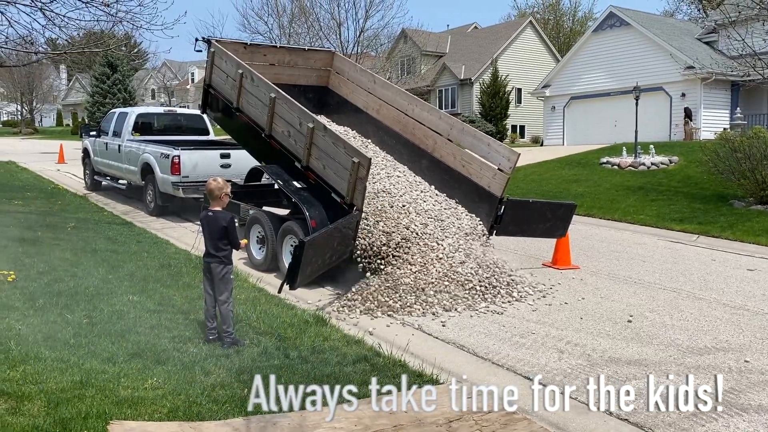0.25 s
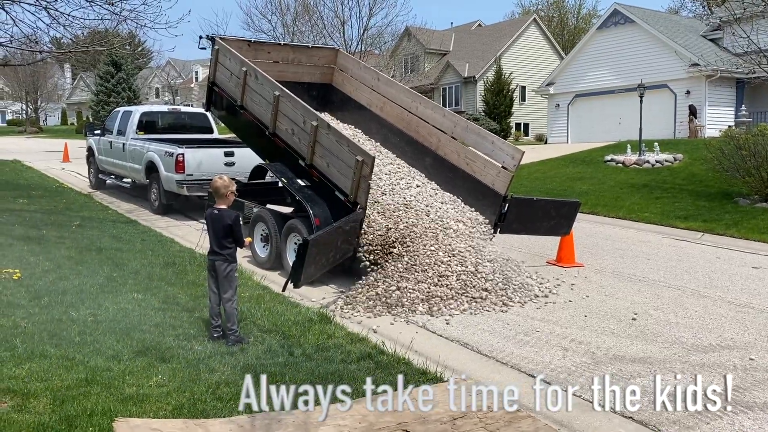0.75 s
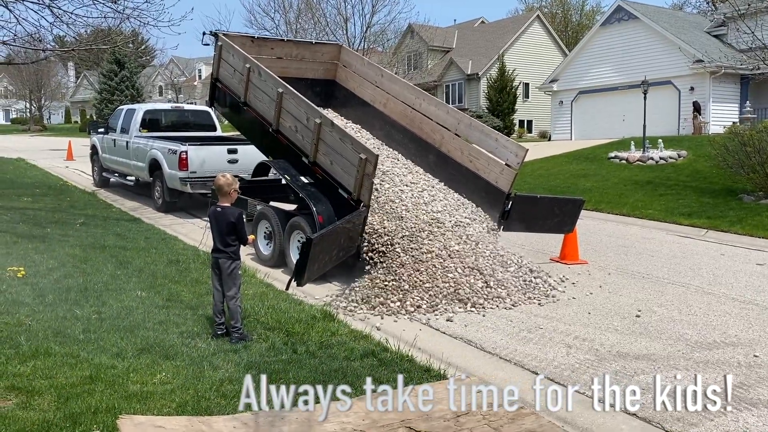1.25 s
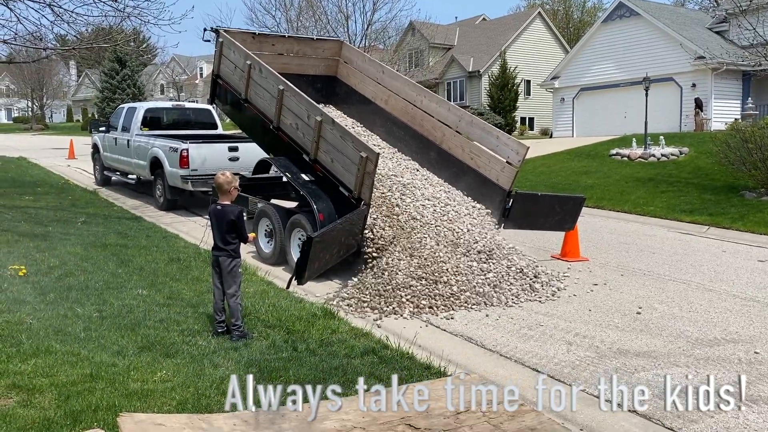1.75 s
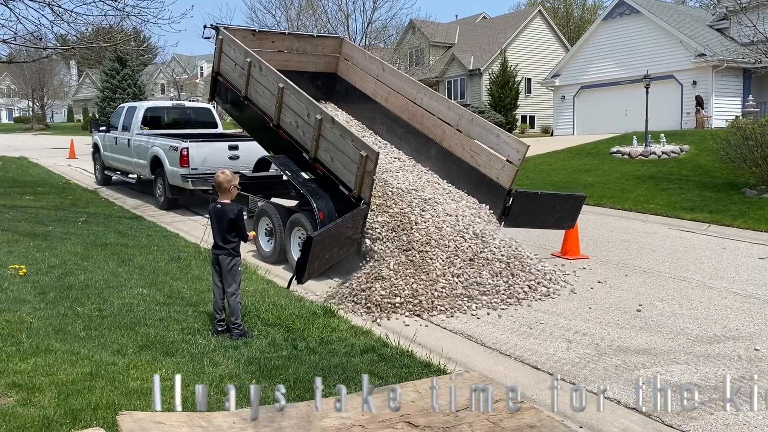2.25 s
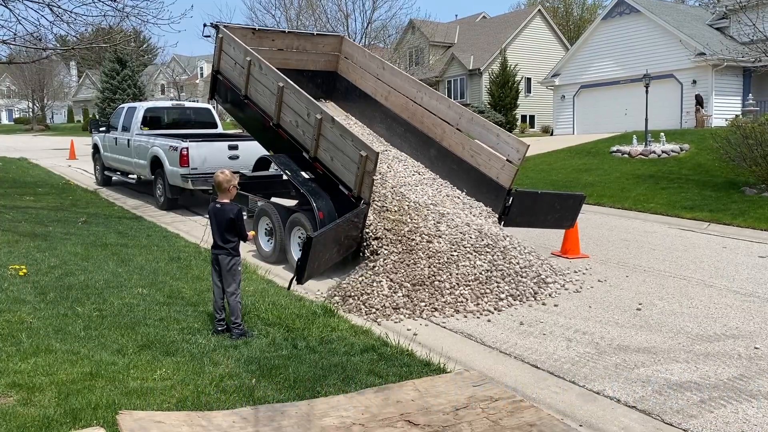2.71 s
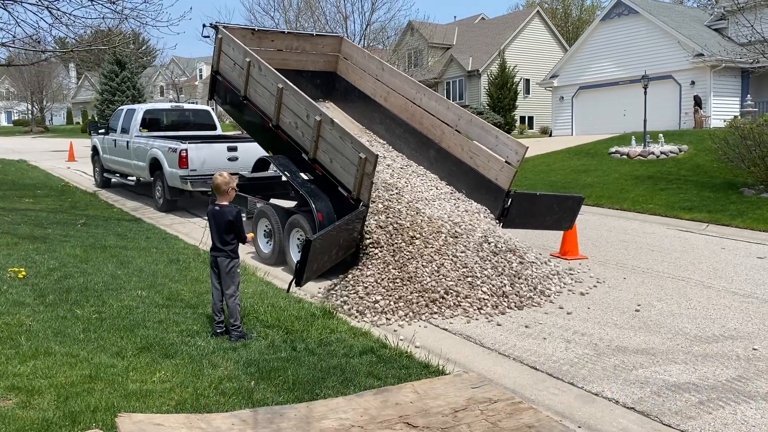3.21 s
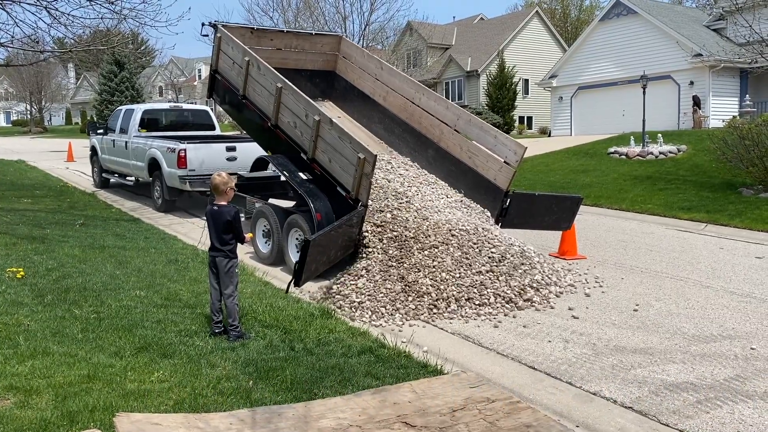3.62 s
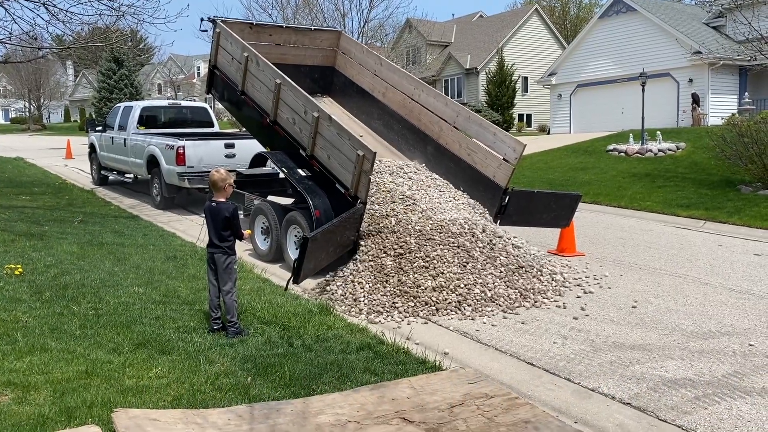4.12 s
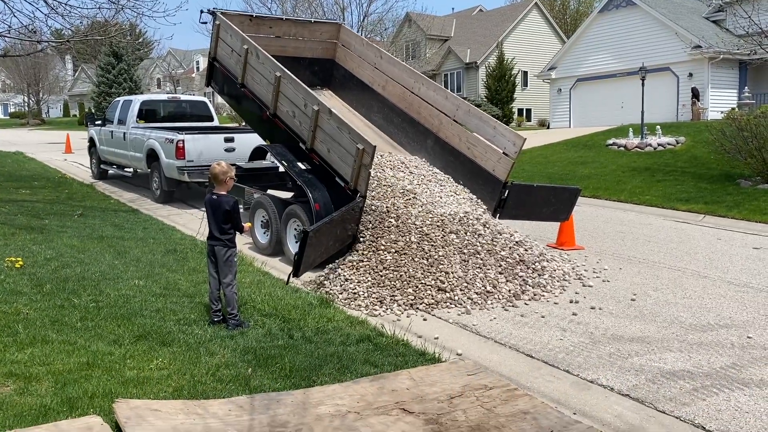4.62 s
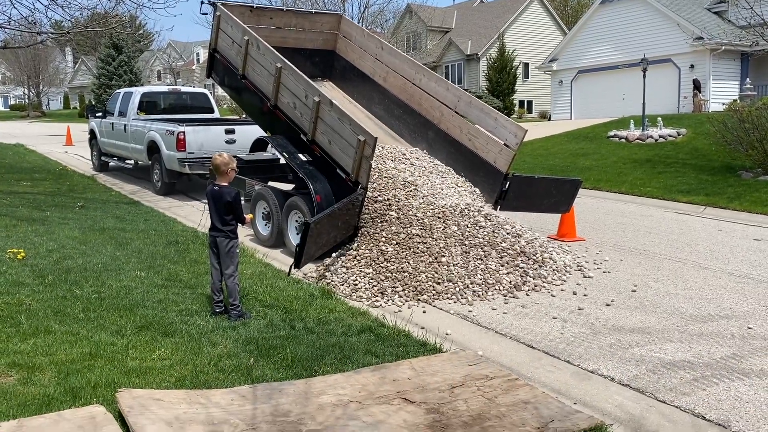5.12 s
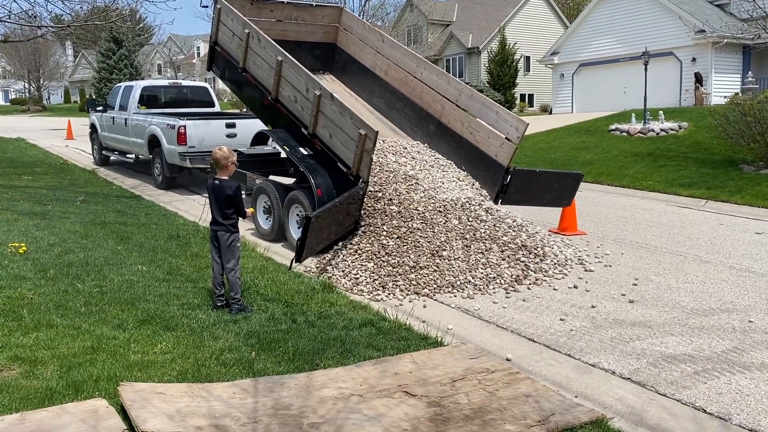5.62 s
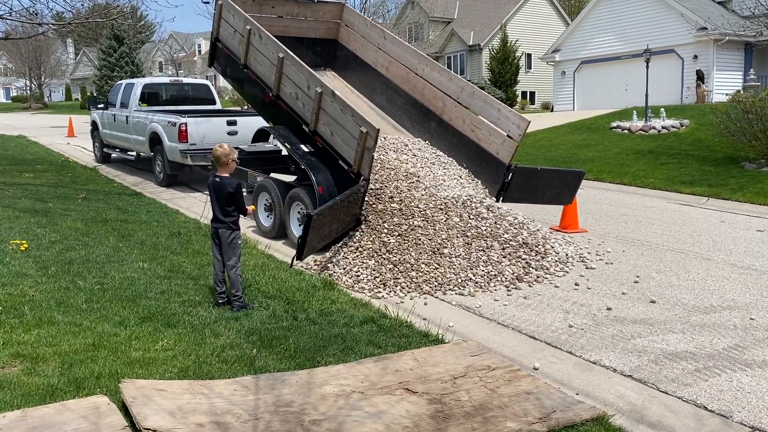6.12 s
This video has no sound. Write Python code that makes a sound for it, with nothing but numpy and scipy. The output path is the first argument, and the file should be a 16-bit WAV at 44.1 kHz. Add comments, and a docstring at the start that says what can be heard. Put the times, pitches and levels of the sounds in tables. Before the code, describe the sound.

Dense roaring clatter of stones pouring off a steep dump bed, ending after four seconds in scattered knocks over a faint idling truck.

```python
"""A truck idles throughout, as filtered noise and a wavering hum, outdoors on a close microphone pair.
From the start rock pours from its tipped trailer: thousands of random contacts a second in coloured bands,
with moving bed resonances and big rocks cracking on top. The rush runs out between about 3.5 and 4.6 s.
Then a fading trickle, short slides, knocks and ticks of single stones and soft bed thumps are left."""
import sys
import numpy as np
from scipy import signal
from scipy.fft import rfft, irfft, next_fast_len
from scipy.io import wavfile

SR = 44100
rng = np.random.default_rng(int(sys.argv[2]) if len(sys.argv) > 2 else 0)


def wav_record(signal):
    """Record a signal, one row per channel, as 16-bit PCM in the file named by sys.argv[1]."""
    frames = np.transpose(np.atleast_2d(signal))
    bounded = np.clip(frames, -1, 1)
    # unit amplitude maps onto the largest positive 16-bit level
    quanta = np.round(bounded * 32767).astype(np.int16)
    wavfile.write(sys.argv[1], SR, quanta)


N = 280035

# engine rumble colour: freq_hz, relative_density_db (per Hz)
IDLE_SPECTRUM = [(20, -22), (35, -21), (55, -10), (78, 1), (112, -10), (140, -13.5), (185, -7.5),
                 (300, -28), (800, -42)]
# engine hum: multiple_of_idle_hz, level_db (rms)
IDLE_ORDERS = [(1, -56), (4, -67.5)]
# bed jolts on its frame: start_s, level_db, pitch_hz
THUMPS = [(4.892, -32, 60), (5.455, -42, 89), (5.574, -33, 63)]
# colour of loose stones: freq_hz, relative_density_db (per Hz)
TRICKLE_SPECTRUM = [(60, 0.5), (170, -7), (280, -5.5), (420, -3.5), (580, -3.5), (720, 4), (820, 1.5),
                    (950, -1), (1300, -0.3), (1750, -4), (2350, 0.7), (3100, -5.5), (4000, -12),
                    (5600, -9.5), (10500, -22), (15000, -36)]
# small slides of a handful of stones: start_s, length_s, level_db, treble_lift_db, low_mid_lift_db
SLIDES = [(4.523, 0.09, -38, 5, -13), (4.826, 0.037, -36.5, 5, -2), (4.874, 0.067, -44, -12, 4),
          (5.262, 0.14, -36.5, -17, -1), (5.402, .1, -41, -14, -1), (5.45, 0.15, -42, -11, 1),
          (5.633, 0.13, -44, 0, 7), (5.764, 0.12, -47.5, -3, 6)]
# heavy stones knocking on bed or heap: start_s, relative_level_db, pitch_hz
KNOCKS = [(4.423, -37, 900), (4.499, -26, 1180), (4.5265, -24, 1900), (4.546, -18, 2460), (4.66, -31, 1150),
          (4.7465, -28, 900), (4.755, -23, 1800), (4.8335, -24, 2400), (4.842, -20, 2100),
          (4.8445, -18, 1390), (4.8485, -31, 1050), (4.858, -21, 1450), (4.8615, -21.5, 2000),
          (4.893, -34, 840), (5.001, -24.5, 900), (5.096, -25, 2750), (5.139, -26, 1360),
          (5.213, -30, 1300), (5.256, -21.5, 1210), (5.27, -29, 1500), (5.2895, -21, 1900),
          (5.293, -32, 950), (5.333, -27, 2400), (5.363, -35, 750), (5.39, -31, 870), (5.423, -34, 2300),
          (5.4575, -31, 950), (5.467, -30, 2300), (5.474, -27, 1100), (5.487, -26, 850), (5.4995, -26, 900),
          (5.638, -26, 1460), (5.645, -26, 800), (5.654, -27, 2300), (5.676, -35, 1090), (5.708, -35, 750),
          (5.733, -36, 750), (5.791, -31, 2300), (5.81, -41, 1200), (5.857, -36, 2300), (5.86, -28, 840),
          (5.915, -25.5, 1240), (5.9865, -33, 2700), (6.011, -29, 1590), (6.04, -32, 2300),
          (6.153, -32, 2270), (6.19, -46, 800), (6.222, -36, 2320)]
# hard stone-on-stone ticks: start_s, relative_level_db, pitch_hz
TICKS = [(4.4767, -27, 6100), (4.486, -34, 5500), (4.53, -34, 6300), (4.8255, -25.5, 6100),
         (4.9695, -35, 5000), (5.1234, -35, 9800), (5.2324, -33, 4800), (5.2773, -34, 5800),
         (5.3123, -36, 6310), (5.34, -42, 7500), (5.351, -40, 4700), (5.4594, -34, 7440),
         (5.4993, -41, 5190), (5.5777, -34, 7400), (5.651, -37, 6000), (5.711, -40, 6500),
         (5.786, -41, 7300), (5.8091, -37, 4000), (5.871, -45, 3300), (5.951, -41, 4200),
         (5.9578, -34, 3700), (5.963, -34, 4900), (5.9868, -39, 3600), (6.0825, -41, 5540),
         (6.1109, -38, 6500), (6.12, -34, 3100), (6.293, -36, 6470), (6.302, -38, 8800)]
# big rocks cracking together above the rush: start_s, relative_level_db, pitch_hz
CRACKS = [(.1296, -22, 2020), (.4439, -10, 2150), (.601, -13, 2120), (.9223, -8.5, 2170), (.9842, -7, 2050),
          (1.0789, -18, 1980), (1.2216, -14, 2060), (1.4865, -8.5, 2260), (1.6955, -7, 2060),
          (2.0552, -22, 2120), (2.6648, -8, 2030), (3.016, -10.5, 2120)]
# colour of rock in the trailer, bed humps near 750 and 2100 Hz: freq_hz, relative_density_db (per Hz)
POUR_SPECTRUM = [(40, -16.5), (90, -7), (190, -5), (320, -2.5), (415, -6), (580, -2), (680, 0), (790, 1.4),
                 (920, -4.5), (1330, -2), (1580, -4), (2000, 0), (2350, -1.5), (3200, -12), (4100, -20.5),
                 (5500, -17.5), (7200, -20), (10500, -24.5), (15000, -35)]
# lumps of the load jam or let go: centre_s, half_length_s, flow_db, drumming_db, clatter_db
SURGES = [(0.05, 0.074, 1.1, -3.5, -2), (0.197, 0.045, 0.2, 0.5, 0), (0.423, 0.13, 1, -1.5, 1.3),
          (0.622, 0.036, 0.7, -2.5, -0.5), (0.834, 0.062, 0.8, 1.5, -0.2), (1.034, 0.046, 0.5, -1.5, -0.5),
          (1.205, .15, 0, 0.5, 0.5), (1.48, 0.033, -1, 0, 1.5), (1.656, 0.035, 0, 5.5, -0.5),
          (1.907, 0.3, 1.44, -0.5, 0.5), (2.083, 0.083, -0.3, 3, 0), (2.28, 0.039, -1, 2, 1),
          (2.405, 0.071, -0.5, 2, 1.5), (2.756, 0.16, 0.2, 0.5, 1.4), (2.893, .035, 0, 1, -1),
          (3.027, 0.05, -0.5, 0, 3), (3.273, 0.15, -0.7, 1.5, 3), (3.54, 0.1, -0.5, -1, .8)]
# bed resonances, sliding as it empties, lowest = drumming: full_hz, empty_hz, width_hz, full_db, empty_db
BED_RESONANCES = [(340, 130, 55, -18, 4), (508, 1460, 75, -3, -43), (2080, 3000, 260, -12, -16)]
# left-right likeness of the pour: freq_hz, likeness (0 to 1)
POUR_LIKENESS = [(30, .985), (150, .996), (400, .985), (750, .96), (1300, .96), (1750, .92), (2100, .94),
                 (2700, .62), (3300, .25), (4100, .1), (4800, .55), (5500, .3), (6800, .95), (15000, .96)]
# left-right likeness of loose stones and truck: freq_hz, likeness (0 to 1)
TRICKLE_LIKENESS = [(30, .98), (130, .93), (400, .9), (550, .84), (750, .92), (1000, .8), (1300, .85),
                    (1750, .66), (2200, .82), (3200, .25), (4100, .2), (4800, .5), (5500, .3), (6800, .95),
                    (15000, .96)]
# microphone balance: freq_hz, left_minus_right_db
BALANCE_DB = [(100, -0.1), (350, -.3), (550, -2.1), (850, 1.2), (1200, -.2), (1650, .4), (2000, -3.5),
              (2300, -4.3), (2800, .7), (3400, 1), (3900, -1.3), (4700, .9), (5500, -1.7), (6300, 0),
              (15000, 0)]
# microphone phase: freq_hz, left_lead_rad
LEAD_RAD = [(100, 0), (400, 0), (700, .25), (1500, .05), (1850, -.2), (2200, .1), (2700, 1.6), (3500, 1.1),
            (4400, .3), (7300, 0), (9020, -3.14), (11200, -6.28), (13300, -9.42), (15300, -12.57)]

TIME_S = np.arange(N) / SR
FFT_SIZE = next_fast_len(N + SR // 2, real=True)
FREQ_HZ = np.maximum(np.arange(FFT_SIZE // 2 + 1) * SR / FFT_SIZE, 1)
IDLE_HZ, RUMBLE_DB = 96.9, -50
FULL_DB, SAG_DB_PER_S = -20.5, 0.6149  # the flow sags as the load shrinks
EMPTY_S, RUN_OUT_S = 4.638, 1.1
TRICKLE_DB, TRICKLE_FADE_DB_PER_S = -41.5, 2.5
GRIT_DB, GRIT_FADE_DB_PER_S = 2.5, 3.5  # treble lift of the trickle: fine grit fades first
BED_WANDER = 0.052  # rms share by which resonance pitch strays as the load shifts
BOOM_FULL_DB, BOOM_EMPTY_DB, BOOM_MOST_DB = -3, 22, 3  # a lighter load booms more, up to the limit
SCATTER_DB, SCATTER_T60_S = -8.5, 0.24
CUTOFF_HZ = 15900


def from_db(db):
    """Decibels to gain."""
    return 10 ** (np.asarray(db) / 20)


def rms_one(x):
    """Scale to unit rms."""
    return x / np.sqrt(np.mean(x ** 2) + 1e-20)


def by_hz(points):
    """Read a table along log frequency."""
    hz, value = np.transpose(points)
    return np.interp(np.log(FREQ_HZ), np.log(hz), value)


def drift(rate_hz):
    """Smooth random curve of unit rms, about rate_hz turns a second."""
    pole = np.exp(-200 * np.pi * rate_hz / SR)  # one step per 100 samples
    noise = rng.standard_normal(N // 100 + 1002)
    slow = signal.lfilter([1], [1, -2 * pole, pole * pole], noise)[1000:]
    return np.interp(np.arange(N) / 100, np.arange(len(slow)), rms_one(slow))


def colour(x, spectrum):
    """Minimum-phase filter of the given spectrum; white noise keeps its power."""
    gain = rms_one(from_db(by_hz(spectrum)))
    cepstrum = irfft(np.log(gain), FFT_SIZE)
    cepstrum[1:FFT_SIZE // 2] *= 2
    cepstrum[FFT_SIZE // 2 + 1:] = 0
    return irfft(rfft(x, FFT_SIZE) * np.exp(rfft(cepstrum)), FFT_SIZE)[..., :N]


def collisions(per_s, spread_db):
    """Randomly timed contacts, sizes spread exponentially in dB; mean power 1."""
    sizes = rms_one(from_db(spread_db * np.minimum(rng.exponential(1, N), 4)))
    chance = np.clip(per_s / SR, 1e-6, 1)
    return (rng.random(N) < chance) * sizes / np.sqrt(chance)


def stones(hits, spectrum, lifts, variety_db):
    """Stones differ, so each contact excites every band at its own strength; two unrelated versions.
    lifts: from_hz, to_hz, lift_db."""
    edges_hz = [25, 140, 260, 500, 1000, 1800, 3400, 5000, 7000, 9500, 12500, 17000]
    out = np.zeros((2, N))
    for low_hz, high_hz in zip(edges_hz, edges_hz[1:]):
        strength = rms_one(from_db(variety_db * rng.standard_normal(N)))
        strength = strength * rng.choice([-1, 1], (2, N))
        centre_hz = np.sqrt(low_hz * high_hz)
        lift_db = sum(db for start_hz, end_hz, db in lifts if start_hz < centre_hz < end_hz)
        band = signal.butter(2, [low_hz, high_hz], "band", fs=SR, output="sos")
        out += signal.sosfilt(band, hits * strength * from_db(lift_db) + 1e-18)
    return colour(out, spectrum)


def clinks(per_s, sharpness_q, count=20):
    """Stones of many sizes, each ringing briefly at its own pitch."""
    out = np.zeros(N)
    for hz in np.geomspace(900, 8000, count):
        b, a = signal.iirpeak(hz, sharpness_q, fs=SR)
        out += signal.lfilter(b, a, collisions(per_s / count, spread_db=0) + 1e-18)
    return out


def clacks(table, chatter_db, t60_s, width, ring_db, ring_cycles):
    """A rough stone strikes once, chatters in a band around its pitch and rings.
    Energy equals 4 ms at the table level; the ring falls 60 dB in ring_cycles."""
    out, age_s = np.zeros((2, N + SR)), np.arange(SR // 16) / SR
    for start_s, level_db, hz in table:
        envelope = from_db(-60 * age_s / t60_s) * np.minimum(age_s * hz / 2, 1)
        contact = rng.standard_normal((2, len(age_s))) * envelope
        contact *= from_db(chatter_db) / np.linalg.norm(contact[0])
        contact[0, 0] += 1  # the strike
        edges_hz = np.clip([hz / (1 + width), hz * (1 + width)], 10, .45 * SR)
        clack = signal.sosfilt(signal.butter(2, edges_hz, "band", fs=SR, output="sos"), contact)
        tone = np.sin(2 * np.pi * hz * age_s) * from_db(-60 * age_s * hz / ring_cycles)
        clack[0] += from_db(ring_db) * tone * np.linalg.norm(clack[0]) / np.linalg.norm(tone)
        clack *= np.sqrt(.004 * SR) / np.linalg.norm(clack[0])
        first = round(start_s * SR)
        out[:, first:first + len(age_s)] += from_db(level_db) * clack
    return out[:, :N]


def ring(start_s, level_db, hz, t60_s):
    """Damped sine struck at start_s."""
    age_s = np.clip(TIME_S - start_s, 0, 2 * t60_s)
    return from_db(level_db - 60 * age_s / t60_s) * np.sin(2 * np.pi * hz * age_s)


def resonate(x, hz, width_hz, size=256):
    """Resonance of peak gain near 1 whose centre moves block by block."""
    out, state = np.zeros_like(x), np.zeros((2, 2))
    r = np.exp(-np.pi * width_hz / SR)
    for i in range(0, N, size):
        w = 2 * np.pi * np.clip(hz[i], 60, 5000) / SR
        poles = [1, -2 * r * np.cos(w), r * r]
        out[:, i:i + size], state = signal.lfilter([1, 0, -1], poles, x[:, i:i + size], zi=state)
    return out * (1 - r * r) / 2


def street(x):
    """Brief scatter off trailer and pavement: a decaying noise tail."""
    age_s = np.arange(SR // 2) / SR
    decay = from_db(-60 * age_s / SCATTER_T60_S) * (age_s > .002)
    tail = rng.standard_normal((2, len(age_s))) * decay
    tail /= np.sqrt(np.sum(tail ** 2, axis=1, keepdims=True))
    return x + from_db(SCATTER_DB) * signal.fftconvolve(x, tail, axes=1)[:, :N]


def microphones(x, likeness):
    """Two spaced ports share x[0] and differ by x[1], with balance and phase set per frequency."""
    common, apart = rfft(x, FFT_SIZE)
    alike = np.clip(by_hz(likeness), 0, 1)
    sides = np.array([[1], [-1]])  # left, right
    pair = np.sqrt((1 + alike) / 2) * common + sides * np.sqrt((1 - alike) / 2) * apart
    pair = pair * from_db(sides * by_hz(BALANCE_DB) / 2) * np.exp(.5j * sides * by_hz(LEAD_RAD))
    return irfft(pair, FFT_SIZE)[:, :N]


def flow_db():
    """Flow over the tail of the bed, relative to full: slow sag, then an even run-out."""
    share = np.clip((EMPTY_S - TIME_S) / RUN_OUT_S, 1e-3, 1)
    return 20 * np.log10(share) - SAG_DB_PER_S * TIME_S


def settling_s():
    """Time since the pour ran out."""
    return np.maximum(TIME_S - EMPTY_S, 0)


def truck(thump_t60_s=0.15, thump_db=0):
    """Idling engine, a wavering hum in noise rumble, and dull jolts of the bed as damped sines."""
    turn_rad = 2 * np.pi * np.cumsum(IDLE_HZ + .6 * drift(3)) / SR
    hum = np.zeros(N)
    for order, level_db in IDLE_ORDERS:
        hum += np.sqrt(2) * np.sin(order * turn_rad) * from_db(level_db + 2 * drift(2.5))
    thumps = sum(ring(start_s, level_db + thump_db, hz, thump_t60_s) for start_s, level_db, hz in THUMPS)
    rumble = from_db(RUMBLE_DB) * colour(rng.standard_normal((2, N)), IDLE_SPECTRUM)
    return rumble + (hum + thumps) * np.array([[1], [0]])


def trickle(per_s=1500, clump_db=0.5, spurt_db=1.8, clatter_db=-0.3, clink_db=-5):
    """Loose stones roll in clumps, clink and spurt fine grit; level holds, then fades once the pour is out."""
    level_db = TRICKLE_DB - TRICKLE_FADE_DB_PER_S * settling_s()
    hits = collisions(per_s, spread_db=0.0) * from_db(level_db + clump_db * drift(35))
    treble_db = GRIT_DB - GRIT_FADE_DB_PER_S * settling_s() + spurt_db * drift(22)
    lifts = [(500, 1000, clatter_db * drift(50)),
             (1000, 3400, clatter_db * drift(70)),
             (3400, 17000, treble_db)]
    rolling = stones(hits, TRICKLE_SPECTRUM, lifts, variety_db=1.0)
    clinking = colour(clinks(per_s=200, sharpness_q=33), TRICKLE_SPECTRUM)
    rolling[0] += from_db(level_db + clink_db) * clinking
    return rolling


def slides(per_s=6000, skew=0.38):
    """Short showers of contacts that break loose quickly and trail off, each with its own tone balance."""
    hits, treble_db, body_db = np.zeros((3, N))
    for start_s, length_s, level_db, high_db, low_db in SLIDES:
        inside = (TIME_S > start_s) & (TIME_S < start_s + length_s)
        progress = (TIME_S[inside] - start_s) / length_s
        swell = from_db(level_db) * np.sin(np.pi * progress ** skew)
        hits[inside] += swell * collisions(per_s, spread_db=-0.5)[inside]
        treble_db[inside], body_db[inside] = high_db, low_db
    lifts = [(260, 1000, body_db), (3400, 17000, treble_db)]
    return stones(hits, TRICKLE_SPECTRUM, lifts, variety_db=1.5)


def single_stones(knock_db=-17, tick_db=-9.5, knock_low_hz=660):
    """Heavy stones knock broadly, coloured like the trickle; small ones tick high and narrow."""
    knocks = clacks(KNOCKS, chatter_db=3, t60_s=0.026, width=0.7, ring_db=-5, ring_cycles=22)
    high_pass = signal.butter(3, knock_low_hz, "high", fs=SR, output="sos")
    knocks = signal.sosfilt(high_pass, colour(knocks, TRICKLE_SPECTRUM))
    ticks = clacks(TICKS, chatter_db=16, t60_s=0.043, width=0.27, ring_db=-1, ring_cycles=60)
    return from_db(knock_db) * knocks + from_db(tick_db) * ticks


def big_rocks(crack_db=-10):
    """Large rocks tumble down the face of the pour: narrow-band chatter and ring."""
    cracks = clacks(CRACKS, chatter_db=14, t60_s=0.03, width=0.23, ring_db=-4, ring_cycles=100)
    return from_db(crack_db) * cracks


def pour(full_per_s=9000, waver_db=0.26, clatter_db=0.9, treble_db=0.96, thin_treble_db=-2.5, clink_db=-5):
    """Sliding load: thinner flow means fewer collisions, more boom and deeper drumming; top stones clink."""
    flow = from_db(flow_db())
    lost = 1 - flow
    surges_db, drum_db, tumble_db = np.zeros((3, N))
    for centre_s, half_s, surge, drum, tumble in SURGES:
        bump = np.exp(-((TIME_S - centre_s) / half_s) ** 2)
        surges_db += surge * bump
        drum_db += drum * bump
        tumble_db += tumble * bump
    strength = flow * from_db(surges_db + waver_db * drift(16))
    hits = collisions(full_per_s * strength, spread_db=-0.26) * from_db(FULL_DB) * strength

    boom_db = np.minimum(BOOM_FULL_DB * flow + BOOM_EMPTY_DB * lost, BOOM_MOST_DB)
    chatter_db = tumble_db + clatter_db * drift(16)
    top_db = treble_db * flow + thin_treble_db * lost
    lifts = [(25, 140, boom_db), (500, 1000, drum_db), (1800, 3400, chatter_db), (3400, 17000, top_db)]
    rush = stones(hits, POUR_SPECTRUM, lifts, variety_db=1.5)
    clinking = colour(clinks(per_s=650, sharpness_q=19.7), POUR_SPECTRUM)
    rush[0] += from_db(FULL_DB + clink_db) * strength * clinking

    bed = np.zeros((2, N))
    for full_hz, empty_hz, width_hz, full_db, empty_db in BED_RESONANCES:
        centre_hz = (full_hz * flow + empty_hz * lost) * (1 + BED_WANDER * drift(1.1))
        gain = from_db(full_db * flow + empty_db * lost)
        bed += gain * resonate(rush, centre_hz, width_hz)
    return rush + bed


def scene():
    """Loose stones and truck spread wide; the pour and its big rocks use their own likeness."""
    around = truck() + street(trickle() + slides() + single_stones())
    rush = street(big_rocks()) + pour()
    return microphones(around, TRICKLE_LIKENESS) + microphones(rush, POUR_LIKENESS)


def record(dry):
    """Roll off the deepest bass and cut the top steeply."""
    dry = signal.sosfilt(signal.butter(6, 46, "high", fs=SR, output="sos"), dry)
    return signal.sosfilt(signal.ellip(10, .1, 90, CUTOFF_HZ, fs=SR, output="sos"), dry)


dry = scene()
out = record(dry)
wav_record(out)
```